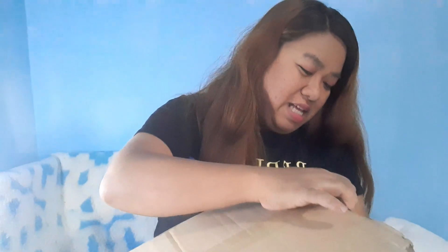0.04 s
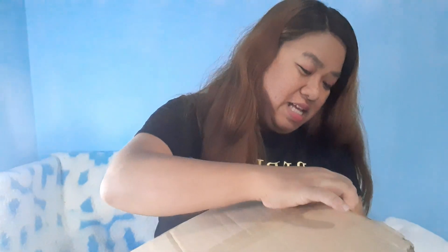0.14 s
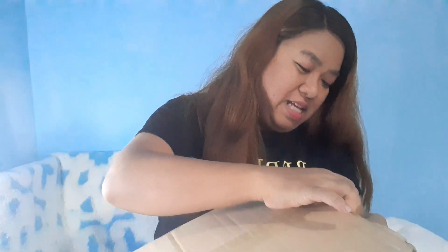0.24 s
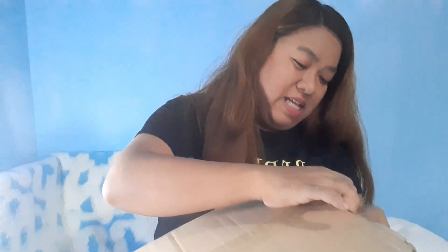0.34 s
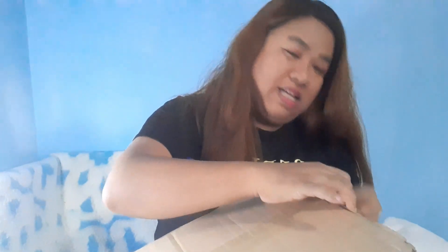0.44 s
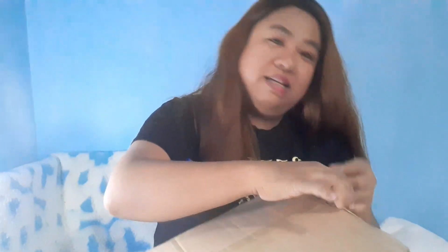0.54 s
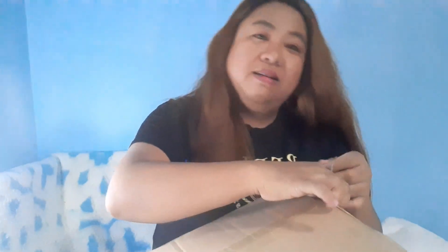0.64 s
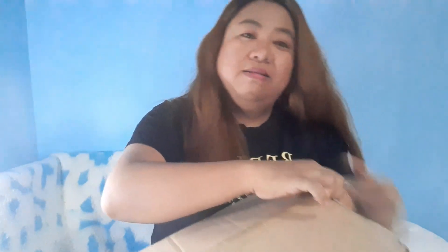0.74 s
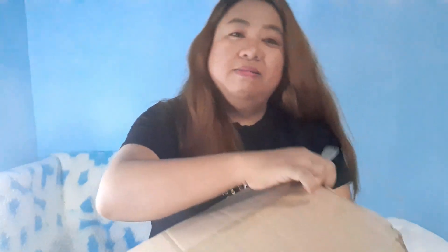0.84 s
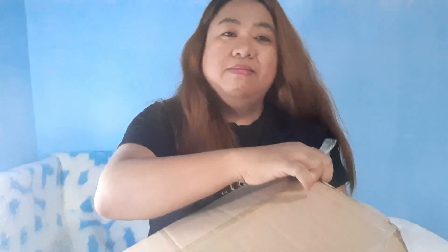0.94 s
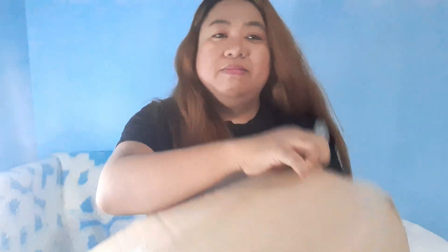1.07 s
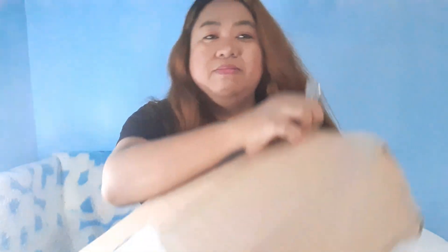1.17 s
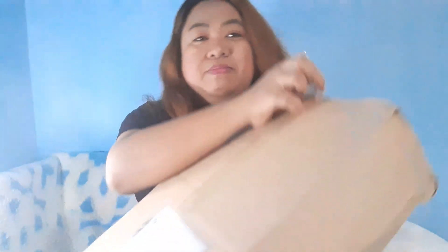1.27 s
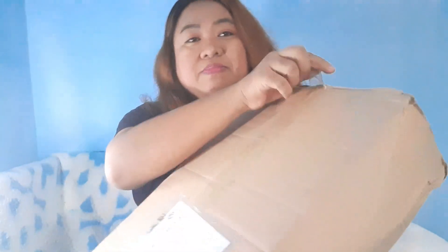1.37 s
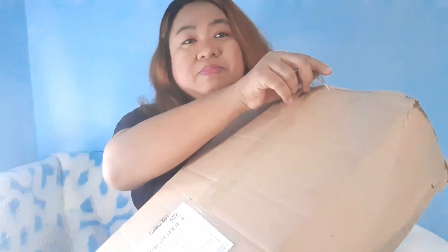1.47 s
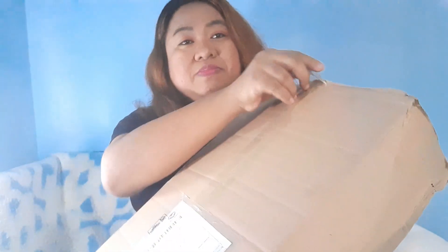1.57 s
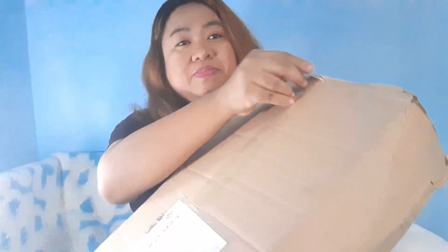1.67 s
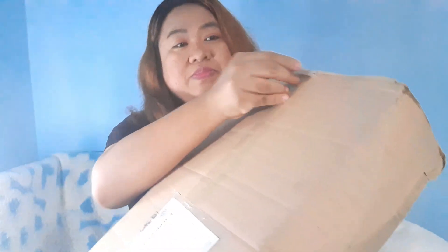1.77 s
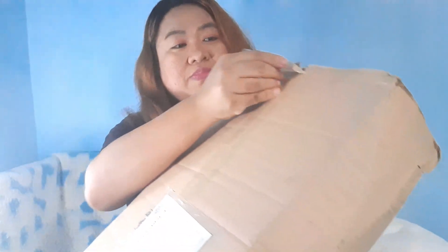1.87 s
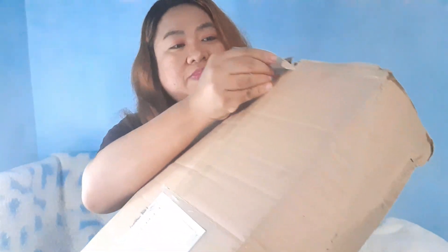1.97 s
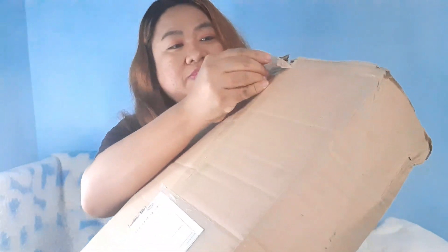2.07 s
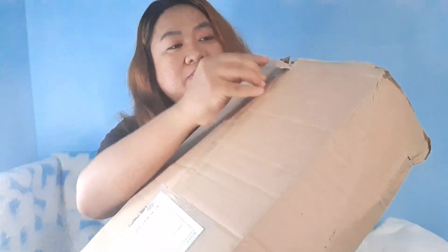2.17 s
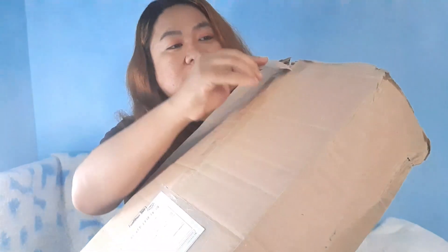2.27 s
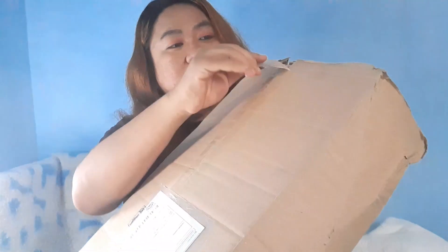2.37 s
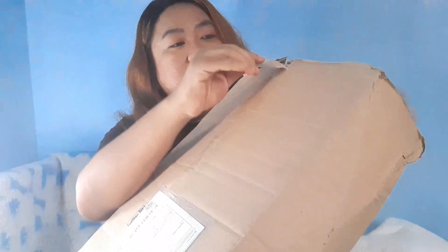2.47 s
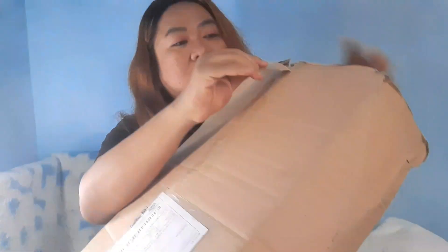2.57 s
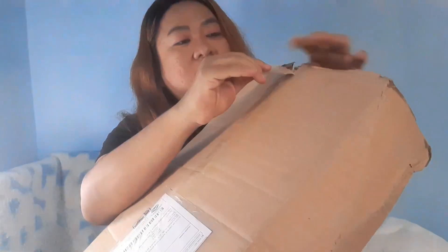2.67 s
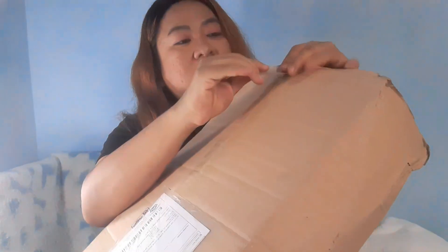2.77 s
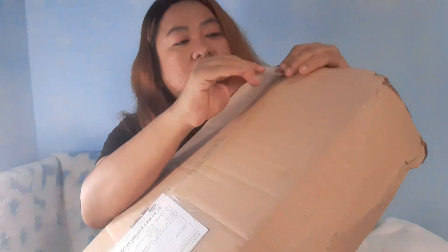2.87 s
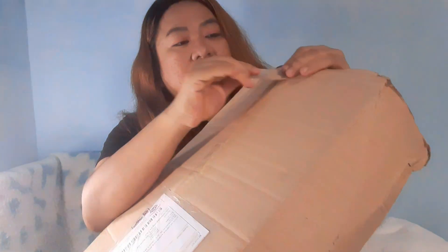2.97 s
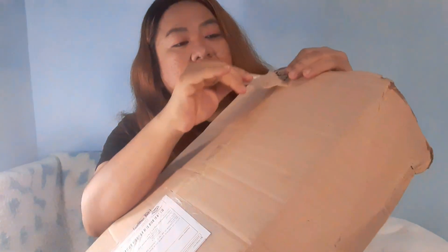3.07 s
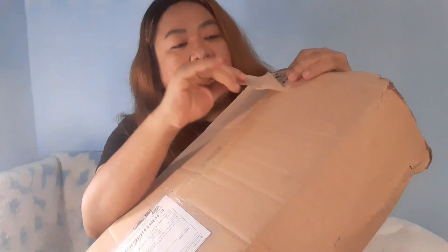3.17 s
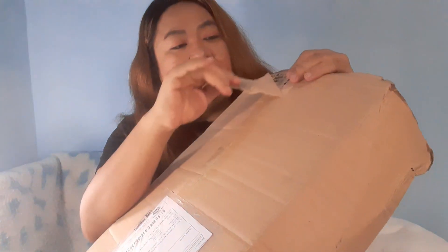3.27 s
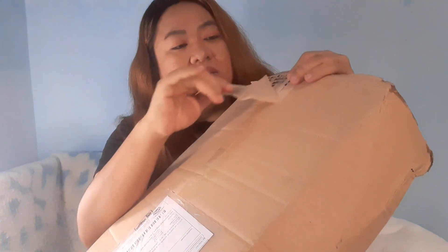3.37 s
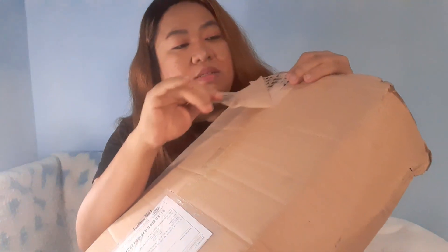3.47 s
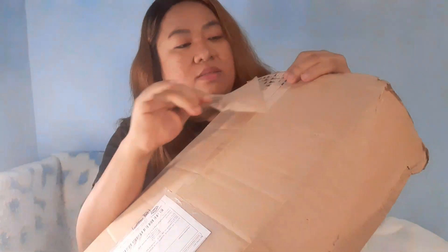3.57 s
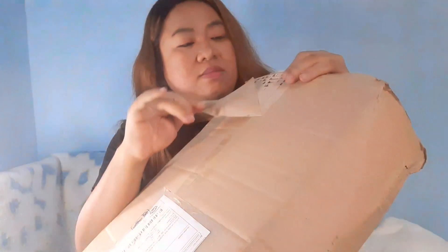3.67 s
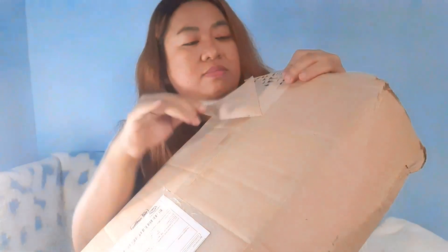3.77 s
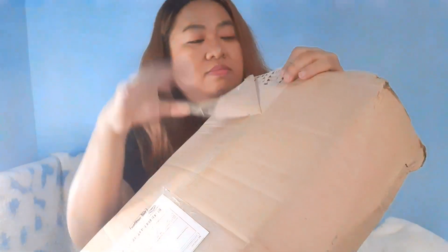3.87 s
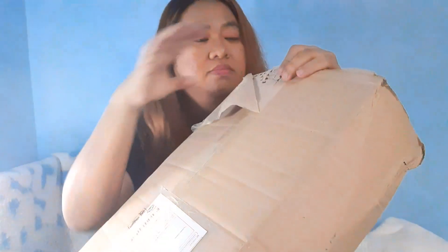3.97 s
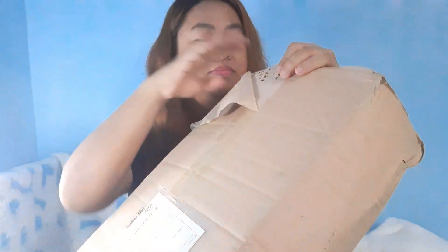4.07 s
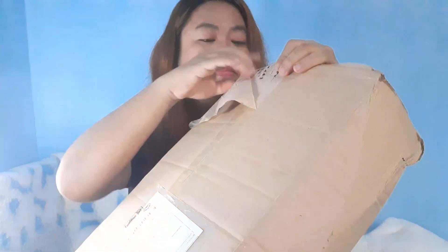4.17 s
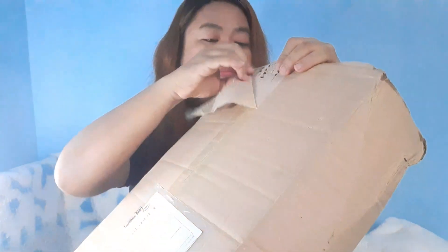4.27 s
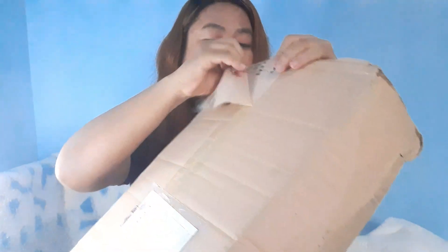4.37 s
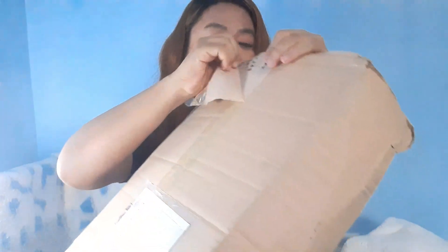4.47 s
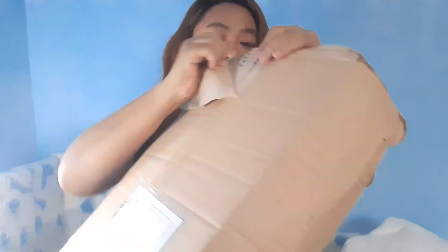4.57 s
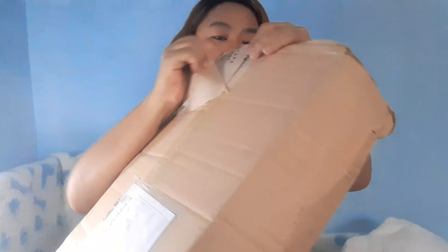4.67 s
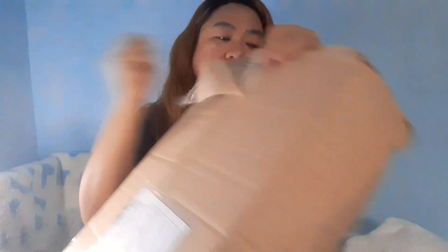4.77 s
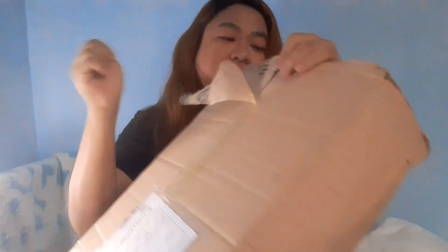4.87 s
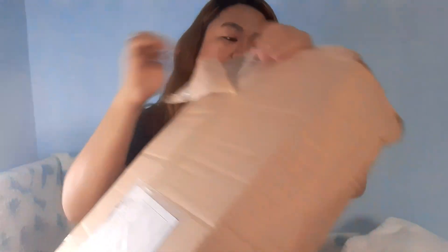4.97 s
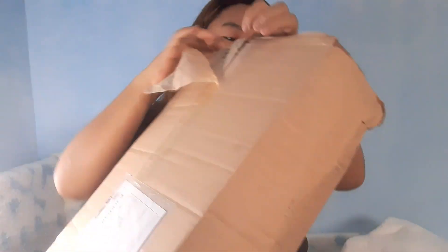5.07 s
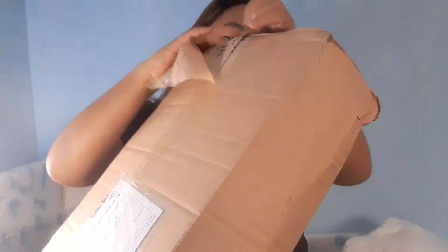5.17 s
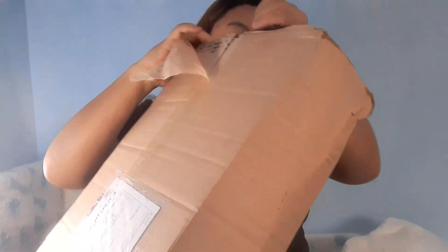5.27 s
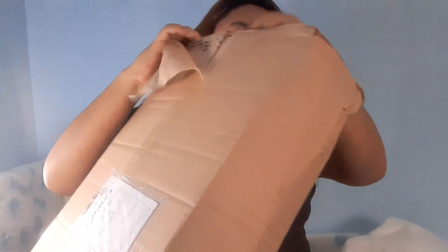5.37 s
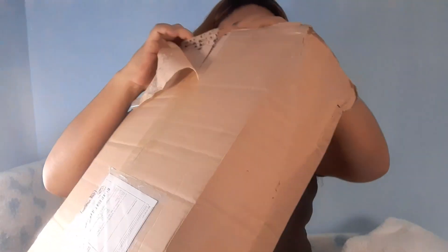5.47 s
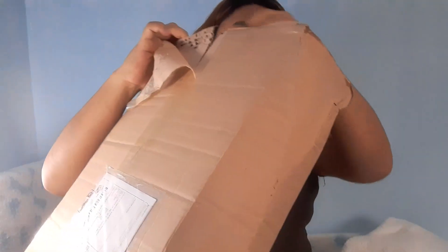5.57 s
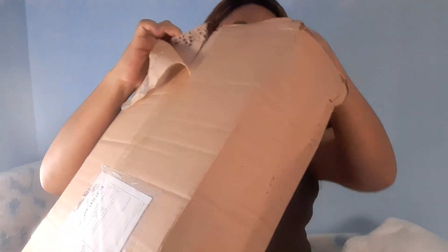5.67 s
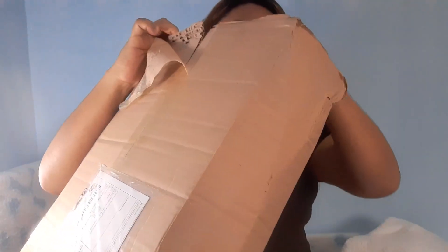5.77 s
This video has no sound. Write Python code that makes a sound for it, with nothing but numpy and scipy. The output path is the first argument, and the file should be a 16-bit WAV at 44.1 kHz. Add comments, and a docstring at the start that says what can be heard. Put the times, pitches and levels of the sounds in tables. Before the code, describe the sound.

In a small bare room, hands scrape and rip at a large empty-sounding cardboard box. Short tearing bursts with sharp snaps and hollow bumps come first, then a longer, swelling rip in the middle, a quieter moment of handling, a hard loud crack and thump, and finally soft scrapes and two knocks. Close stereo microphone, short lively wall echoes, very faint air.

```python
"""Small bare room: packing tape is picked loose and ripped off a large cardboard box by hand.
Parting fibres fizz (dense random clicks), hands scrape the board (sparser clicks), and both rumble
through the modes of the hollow box. Tape and creases snap as short noise bursts; panels knock with
a falling pitch as the box is gripped and turned. Echoes off the walls and faint air lie behind."""
import sys
import numpy as np
from scipy import signal
from scipy.fft import rfft, irfft
from scipy.io import wavfile
from scipy.ndimage import uniform_filter1d

SR = 44100
rng = np.random.default_rng(int(sys.argv[2]) if len(sys.argv) > 2 else 0)


def persist_wave(psi):
    """Save psi, clipped to +-1, as 16-bit WAV."""
    counts = np.round(np.clip(psi, -1, 1) * 32767).astype(np.int16)
    wavfile.write(sys.argv[1], SR, np.atleast_2d(counts).T)


N = 256662
TIME_S = np.arange(N) / SR

# All table levels are relative: each source adds its own gain.
# pulls on the tape: start t/s, length/s, tearing level/dB, swell from start to end of the pull/dB
RIPS = [(0.436, 0.19, -30.5, 9), (0.826, 0.077, -36.5, -8.5), (1.147, 0.21, -47.5, 20),
        (1.372, 0.058, -35, -4), (1.69, 0.16, -53, 2), (1.859, 0.033, -29, -11), (1.983, 0.35, -43.5, -4.5),
        (2.455, 0.05, -37.5, 0.5), (2.809, 0.32, -37.5, 10.5), (3.012, 0.068, -29, 9),
        (3.099, 0.41, -29.5, 9), (3.552, 0.2, -28.5, 1.5), (4.284, 0.07, -42.5, 16),
        (4.572, 0.094, -31.5, 10), (4.674, 0.15, -29, -8), (5.191, 0.11, -48, 9), (5.335, 0.28, -59.5, -2),
        (5.696, 0.053, -44.5, 7.5)]
# hands sliding on the box: start t/s, length/s, scraping level/dB, shaking level/dB
RUBS = [(0.0, 0.015, -33.5, -41), (0.063, 0.16, -65.5, -82), (0.49, 0.027, -25, -26),
        (0.562, 0.053, -25, -31.5), (1.065, 0.069, -36, -28), (1.179, 0.12, -35, -33.5),
        (1.22, 0.012, -55, -35), (1.333, 0.15, -43.5, -35.5), (1.539, 0.046, -45.5, -34),
        (1.76, 0.052, -50.5, -45), (1.857, 0.056, -37, -29.5), (2.01, 0.25, -64, -54),
        (2.36, 0.033, -45, -43), (2.476, 0.035, -40, -37), (2.765, 0.053, -61, -52.5),
        (2.831, 0.089, -74, -45), (2.917, 0.053, -66, -34), (3.24, 0.066, -35, -51),
        (3.393, 0.14, -35.5, -38), (3.649, 0.096, -35, -36), (3.853, 0.053, -50, -38.5),
        (4.034, 0.038, -53, -54.5), (4.252, 0.36, -47.5, -42), (4.461, 0.016, -45.5, -48),
        (4.646, 0.086, -30, -31), (4.819, 0.056, -34, -26), (4.904, 0.14, -45, -46.5),
        (5.083, 0.2, -56.5, -45), (5.268, 0.067, -47.5, -42.5), (5.365, 0.15, -48, -39.5),
        (5.553, 0.028, -50, -42.5), (5.734, 0.037, -42, -25)]
# tape and creases giving way: t/s, flap crack level/dB, flap f/Hz, tape film tick level/dB
SNAPS = [(0.425, -41, 1780, -60), (0.4557, -22, 1690, -32), (0.471, -15.5, 1100, -26),
         (0.4878, -16.5, 1340, -25), (0.7735, -29, 2150, -32), (0.814, -30, 1520, -28),
         (0.8603, -15, 3670, -13), (1.07, -23, 2040, -35), (1.134, -17.5, 1780, -52),
         (1.1625, -25.5, 2100, -18.5), (1.3804, -13.5, 2020, -16.5), (1.4068, -39, 8460, -15),
         (1.4412, -17, 1620, -22), (1.4678, -33, 1920, -18.5), (1.6262, -23.5, 2010, -34),
         (1.6855, -21.5, 3270, -38), (1.723, -32, 7200, -31), (1.8619, -20, 3970, -49),
         (1.927, -16, 3940, -26), (1.9882, -18.5, 3860, -15), (2.4354, -32, 1390, -28),
         (2.476, -43, 1330, -40), (2.7284, -51, 8720, -33), (2.9322, -22, 1330, -39),
         (3.904, -23.5, 1800, -27.5), (3.9349, -23.5, 7000, -21), (4.063, -30, 2500, -27),
         (4.3843, -30, 1530, -35), (4.4931, -23, 3800, -29), (4.787, -17.5, 1460, -15),
         (4.815, -11, 7600, -8.5), (4.827, -11.5, 1600, -35)]
# panels buckling or bumped: t/s, level/dB, settled panel f/Hz, paper liner level/dB, settled liner f/Hz
KNOCKS = [(0.001, -26.5, 307, -33, 495), (0.471, -27.5, 215, -24, 550), (0.487, -25, 380, -21, 744),
          (1.069, -32, 229, -41, 955), (1.087, -21.5, 250, -35, 497), (1.184, -20.5, 348, -31, 484),
          (1.228, -23.5, 252, -29, 980), (1.254, -17, 352, -22, 823), (1.7, -22.5, 276, -66, 594),
          (1.863, -16, 353, -28, 530), (1.986, -20.5, 343, -18.5, 790), (2.436, -24, 437, -28, 520),
          (2.475, -17.5, 369, -16, 443), (2.93, -22.5, 358, -30.5, 496), (3.659, -21.5, 296, -26, 660),
          (3.903, -34.5, 326, -35.5, 1030), (4.257, -36, 230, -43, 600), (4.287, -31, 354, -40, 750),
          (4.495, -21.5, 221, -29.5, 475), (4.824, -13.5, 202, -14, 476), (4.859, -19, 340, -24.5, 630),
          (5.307, -36.5, 347, -49, 640), (5.757, -15, 268, -29.5, 455), (5.791, -19, 353, -55, 460)]
# modes of the hollow box: f/Hz, level/dB, t60/s
BOX_MODES = [(72, -41, .16), (104, -7.5, 0.063), (136, -4.5, 0.15), (220.3, -9, 0.12), (259.7, -8.5, 0.29),
             (330.7, 2.5, 0.12), (364.7, 1.5, 0.13), (412, 7, 0.043), (529, 1, 0.043), (603, -3, 0.036),
             (718, -11.5, 0.021), (877, 2.5, 0.019)]

# spectra: f/Hz, level per Hz/dB
FIBRE_SPECTRUM = [(40, 0), (85, 0.5), (180, -0.5), (500, -18), (730, 0.5), (1000, -19), (2000, -4.5),
                  (3200, -5.5), (5000, -5.5), (7000, -5), (8600, -0.5), (9800, -8.5), (12500, -2.5),
                  (15500, -7)]
BUNDLE_SPECTRUM = [(200, -5), (1500, -3), (4000, -2.5), (8500, 2.5), (16000, 1)]
BOARD_SPECTRUM = [(150, -6), (400, -3.5), (700, 2), (1000, 3.5), (1400, 1.5), (1850, 2), (2600, -5),
                  (4000, -6), (8000, -11), (16000, -19.5)]
CRACK_SPECTRUM = [(200, 8), (800, 2), (1800, 3.5), (2800, -4), (4500, -2.5), (8000, -7), (16000, 2)]
FILM_SPECTRUM = [(500, -17), (3500, -13), (7000, 7.5), (8600, 9.5), (10000, -0.5), (16000, 7.5)]
RUMBLE_SPECTRUM = [(20, -30), (40, -52), (70, -14.5), (130, 0.5), (300, 11), (500, -18.5), (900, 4),
                   (3000, -44.5), (16000, -103)]
AIR_SPECTRUM = [(20, -12), (70, 20), (300, 29), (700, 3), (1400, 22), (3000, -76), (8000, -53),
                (16000, -64)]

# decay of the room: f/Hz, t60/s
ROOM_T60 = [(100, 0.36), (350, 0.42), (1000, 0.35), (2000, 0.4), (5000, 0.41), (9000, 0.39), (16000, 0.28)]
# likeness of left and right echoes: f/Hz, correlation (-1 to 1)
ROOM_LIKENESS = [(100, 0.95), (300, 0.89), (550, 0.43), (1100, -0.1), (2200, 0.052), (5000, 0.016),
                 (16000, 0.062)]
# reflections off the nearest surfaces: delay t/s
ECHO_S = [.0014, .0034, .0112, .0198]
# standing waves at the microphone: f/Hz, level/dB
STANDING_WAVES = [(90, -4.5), (128, 3), (162, -3.5), (212, 3.5), (280, -0.5), (335, 2.5), (500, -1),
                  (680, 2), (950, -0.5), (1300, 0)]
# microphone ports: f/Hz, left minus right level/dB
PORTS = [(100, -4), (250, -2), (500, -1.2), (2000, -1), (4000, -0.5), (8000, -2.1), (12000, 2.5)]

RIP_RISE_S, RIP_RELEASE_S, EASE_S_PER_DB = 0.0054, 0.015, 0.004  # ease: extra rise per dB of swell
RIP_SCRAPE_DB, RIP_SHAKE_DB = -10.5, -8.5  # a pull also drags on the board and shakes the box
RUB_RISE_S, RUB_RELEASE_S = 0.0027, 0.027
RESTING_DB = -67  # the hands are never quite still
PANEL_CYCLES = 9.6  # swings per t60, so low panels ring longer
PUSH_HZ, PUSH_DB_PER_OCTAVE = 247, -47  # wide, low panels push more air
EDGE_HZ = 15700


def amp(level_db):
    """Decibels to gain."""
    return 10 ** (np.asarray(level_db) / 20)


def unit(x):
    """Scales to an energy of one."""
    return x / np.sqrt(np.sum(x ** 2) + 1e-20)


def read(points, hz):
    """Joins points by straight lines over log frequency."""
    point_hz, value = np.transpose(points)
    return np.interp(np.log(hz + 1), np.log(point_hz), value)


def add(mix, start_s, sound):
    """Lays a sound into the mix at start_s."""
    part = mix[max(round(start_s * SR), 0):][:len(sound)]
    part += sound[:len(part)]


def through(x, response):
    """Convolves and keeps the length."""
    return signal.fftconvolve(x, response)[:len(x)]


def colour(points, size=4096):
    """Minimum-phase impulse response with the given spectrum, at unit energy."""
    hz = abs(np.fft.fftfreq(size, 1 / SR))
    log_gain = np.log(amp(read(points, hz)))
    spectrum = np.exp(np.conj(signal.hilbert(log_gain)))
    return unit(np.fft.ifft(spectrum).real[:size // 2])


def mode(hz, t60_s):
    """One dying vibration."""
    t = TIME_S[:SR // 3]
    return np.sin(2 * np.pi * hz * t) * 1e-3 ** (t / t60_s)


def burst(t60_s, evenness=0.34, rise_s=0.00066):
    """A cluster of tiny fractures that builds and dies away, its energy evened over frequency."""
    t = TIME_S[:SR // 5]
    swell = (1 - np.exp(-t / rise_s)) * 1e-3 ** (t / max(t60_s, 1e-3))
    spectrum = rfft(rng.standard_normal(len(t)) * swell, SR // 2)
    evened = spectrum / (abs(spectrum) + 1e-6) ** min(evenness, 1)
    return unit(irfft(evened)[:len(t)])


def grains(per_s, spread_db, clump_db, clump_hz):
    """Random clicks of uneven size in clumps, their power levelled over 3000 samples."""
    sizes = amp(spread_db * np.minimum(rng.exponential(1, N), 3)) * rng.choice([-1, 1], N)
    clicks = sizes * (rng.random(N) < per_s / SR)
    drift = np.clip(rng.standard_normal(N), -2, 2)
    clumps = np.interp(TIME_S * clump_hz, np.arange(N), drift)
    clicks = clicks * amp(clump_db * clumps)
    power = uniform_filter1d(clicks ** 2, size=3000)
    return clicks / np.sqrt(abs(power) + 1e-6)


def stroke(start_s, length_s, rise_s, release_s, swell_db=0):
    """One move of the hand: it takes hold, keeps on, swells or fades, and lets go."""
    t = TIME_S - start_s
    held = amp(swell_db * (np.clip(t / length_s, 0, 1) - .5))
    release = np.exp(-np.maximum(t - length_s, 0) / release_s)
    return np.clip(t / rise_s, 0, 1) * held * release


def hands():
    """How hard the hands tear, scrape and shake the box from moment to moment."""
    pull = np.zeros(N)
    for start_s, length_s, level_db, swell_db in RIPS:
        rise_s = RIP_RISE_S + EASE_S_PER_DB * max(swell_db, 0)  # a swelling pull also starts gently
        pull += amp(level_db) * stroke(start_s, length_s, rise_s, RIP_RELEASE_S, swell_db)
    scrape, shake = np.full((2, N), amp(RESTING_DB))
    for start_s, length_s, scrape_db, shake_db in RUBS:
        slide = stroke(start_s, length_s, RUB_RISE_S, RUB_RELEASE_S)
        scrape = scrape + amp(scrape_db) * slide
        shake = shake + amp(shake_db) * slide
    # pulls and rubs add in power
    scrape = np.hypot(scrape, amp(RIP_SCRAPE_DB) * pull)
    shake = np.hypot(shake, amp(RIP_SHAKE_DB) * pull)
    return pull, scrape, shake


def tearing(pull, level_db=0):
    """Thousands of paper fibres a second part under the lifting tape."""
    breaks = grains(per_s=4000, spread_db=6, clump_db=5, clump_hz=220)
    return amp(level_db) * through(breaks * pull, colour(FIBRE_SPECTRUM))


def crackle(pull, level_db=-23, follows=0.57):
    """Thicker fibre bundles break with clicks of their own; follows < 1 bares them in weak pulls."""
    breaks = grains(per_s=70, spread_db=3.2, clump_db=3, clump_hz=20)
    bundle = unit(through(burst(.003), colour(BUNDLE_SPECTRUM)))
    return amp(level_db) * through(breaks * pull ** follows, bundle)


def snaps(crack_db=18, ring_db=-1, cycles=4, break_t60_s=0.0063, crumble_t60_s=0.008, crumble_db=-6):
    """A quick run of breaks and a longer crumble drive the stiff flap, which cracks and rings."""
    out, crack = np.zeros(N), colour(CRACK_SPECTRUM)
    for start_s, level_db, flap_hz, _ in SNAPS:
        force = burst(break_t60_s) + amp(crumble_db) * burst(crumble_t60_s)
        ring = np.diff(mode(flap_hz, cycles / flap_hz), prepend=0)  # a small flap radiates little bass
        flap = unit(through(force, crack)) + amp(ring_db) * unit(through(force, ring))
        add(out, start_s, amp(level_db + crack_db) * unit(flap))
    return out


def ticks(gain_db=17, t60_s=0.0065):
    """With each snap the thin tape film ticks brightly."""
    out, film = np.zeros(N), colour(FILM_SPECTRUM)
    for start_s, _, _, level_db in SNAPS:
        tick = unit(through(burst(t60_s), film))
        add(out, start_s, amp(level_db + gain_db) * tick)
    return out


def scraping(pressure, level_db=-0.5):
    """Fingers and flaps stick and slip on the board."""
    slips = grains(per_s=1600, spread_db=5, clump_db=4.5, clump_hz=130)
    return amp(level_db) * through(slips * pressure, colour(BOARD_SPECTRUM))


def squeak(start_s=4.03, length_s=0.1, hz=2520, level_db=-48):
    """The loose tape rubs briefly: noise through one resonance gives a hoarse squeak."""
    out, swell = np.zeros(N), np.hanning(round(length_s * SR))
    rub = through(rng.standard_normal(len(swell)), unit(mode(hz, .016)))
    add(out, start_s, amp(level_db) * rub * swell)
    return out


def panel(hz, t60_s, sag=0.5, sag_s=0.0029, rise_s=0.0024):
    """A bent panel starts taut and high, and its pitch drops as it lets go."""
    t = TIME_S[:SR // 3]
    pitch_hz = hz * (1 + sag * np.exp(-t / sag_s))
    swing = (1 - np.exp(-(t / rise_s) ** 2)) * 1e-3 ** (t / t60_s)
    return unit(np.sin(2 * np.pi * np.cumsum(pitch_hz) / SR) * swing)


def box_ring(dull_db=-3):
    """Answer of the box to a tap: its modes, in alternating sign, over a dull push of air."""
    modes = ((-1) ** k * amp(level_db) * mode(hz, t60_s)
             for k, (hz, level_db, t60_s) in enumerate(BOX_MODES))
    ring = unit(sum(modes))
    add(ring, 0, amp(dull_db) * colour(RUMBLE_SPECTRUM))
    return unit(ring)


def knocks(panel_db=24, box_db=18, liner_ring_db=21, slap_db=16, push_db=6,
           liner_t60_s=0.011, slap_t60_s=0.051):
    """The panel swings at its own pitch, the box rings, the liner slaps and a puff of air is pushed out."""
    out, box, board = np.zeros(N), box_ring(), colour(BOARD_SPECTRUM)
    push = unit(mode(59, 0.049) - mode(118, 0.062) + mode(147, 0.079))
    for start_s, level_db, hz, liner_db, liner_hz in KNOCKS:
        add(out, start_s, amp(level_db + panel_db) * panel(hz, PANEL_CYCLES / hz))
        add(out, start_s, amp(level_db + box_db) * box)
        liner = panel(liner_hz, liner_t60_s, sag=0.6, sag_s=0.0029)
        add(out, start_s, amp(liner_db + liner_ring_db) * liner)
        slap = unit(through(burst(slap_t60_s), board))
        add(out, start_s, amp(liner_db + slap_db) * slap)
        size_db = PUSH_DB_PER_OCTAVE * np.log2(hz / PUSH_HZ)
        add(out, start_s, amp(level_db + push_db + size_db) * push)
    return out


def flexing(shake, level_db=-2):
    """Small jerks of the hands shake the whole box, which rings at its modes."""
    jerks = grains(per_s=700, spread_db=3.5, clump_db=2.5, clump_hz=60.53)
    return amp(level_db) * through(jerks * shake, box_ring())


def split(x, wet_db):
    """Shares a source between the straight path and the way round the walls, at constant power."""
    return np.outer([1, amp(wet_db)], x) / np.hypot(1, amp(wet_db))


def near_paths(x, echo_db=-11):
    """Direct sound, one sample later on the left, and the first reflections."""
    out = []
    for side in range(2):  # left, right
        taps = np.zeros(SR // 20)
        taps[1 - side] = 1
        for k, delay_s in enumerate(ECHO_S):
            offset = side * (-1) ** k * (k + 2)  # right differs by a few samples
            taps[round(delay_s * SR) + offset] += amp(echo_db)
        out.append(through(x, unit(taps)))
    return np.array(out)


def room_tail(build_s=0.001):
    """Diffuse echoes for two microphones: alike in the bass, each band dying at its own speed."""
    noise = rng.standard_normal((2, SR * 2 // 3))
    hz, t, (a, b) = signal.stft(noise, SR, nperseg=256)
    likeness = np.clip(read(ROOM_LIKENESS, hz), -1, 1)[:, None]
    mid, side = a * np.sqrt(1 + likeness), b * np.sqrt(1 - likeness)
    decay = 1e-3 ** (t / read(ROOM_T60, hz)[:, None])
    tails = signal.istft(np.array([mid + side, mid - side]) * decay, SR)[1]
    build = 1 - np.exp(-(TIME_S[:tails.shape[1]] / build_s) ** 2)
    return [unit(tail * build) for tail in tails]


def room(x, count=8, turns_per_s=2.6):
    """Echo paths change as hands and box move: a cycle of tails, each handing over to the next."""
    out = np.zeros((2, N))
    for k in range(count):
        phase = (turns_per_s * count * TIME_S + k) % count
        share = np.sin(np.pi / 2 * np.minimum(phase, 2))  # silent once phase passes 2
        out += [through(x * share, tail) for tail in room_tail()]
    return out


def room_air(level_db=-71):
    """Faint steady background: coloured noise, independent left and right."""
    air = [through(noise, colour(AIR_SPECTRUM)) for noise in rng.standard_normal((2, N))]
    return amp(level_db) * np.array(air)


def scene():
    """Tearing happens on the far edge of the box, so it arrives mostly by way of the walls."""
    pull, scrape, shake = hands()
    paths = split(tearing(pull), wet_db=6.5)
    paths += split(ticks() + crackle(pull), wet_db=-3.5)
    paths += split(snaps(), wet_db=1.0)
    paths += split(scraping(scrape) + squeak(), wet_db=3)
    paths += split(knocks(), wet_db=-3.5)
    paths += split(flexing(shake), wet_db=-7.5)
    direct, diffuse = paths
    return near_paths(direct) + room(diffuse) + room_air()


def record(dry, low_cut_hz=52):
    """Standing waves at the microphone, two ports of different colour, a bass cut and the band limit."""
    hz = np.fft.rfftfreq(2 * N, 1 / SR)
    port_share = np.array([[.5], [-.5]])  # left, right
    colour_db = read(STANDING_WAVES, hz) + read(PORTS, hz) * port_share
    heard = irfft(rfft(dry, 2 * N) * amp(colour_db))[:, :N]
    bass_cut = signal.butter(4, low_cut_hz, "highpass", fs=SR, output="sos")
    heard = signal.sosfilt(bass_cut, heard)
    band_limit = signal.firwin(401, EDGE_HZ, window=("kaiser", 8), fs=SR)
    return signal.oaconvolve(heard, band_limit[None], "same")


dry = scene()
out = record(dry)
persist_wave(out)
```